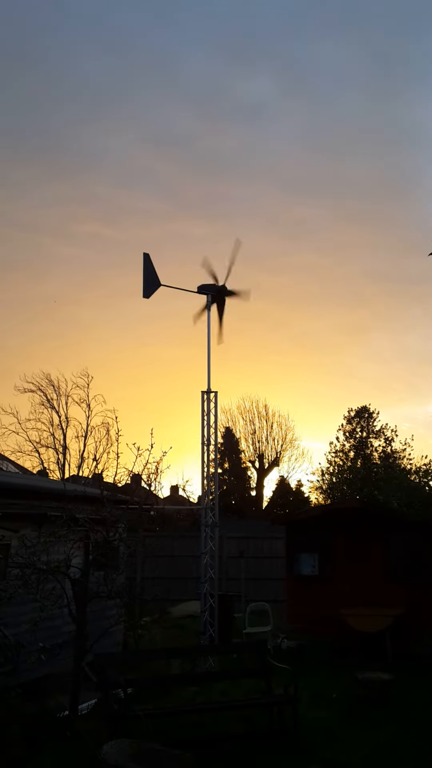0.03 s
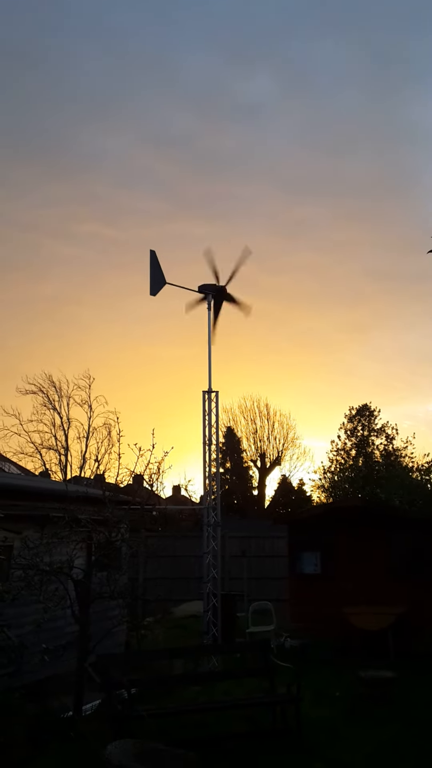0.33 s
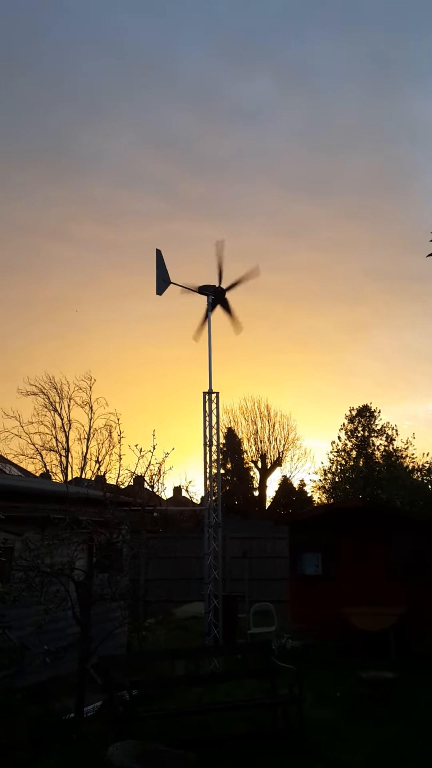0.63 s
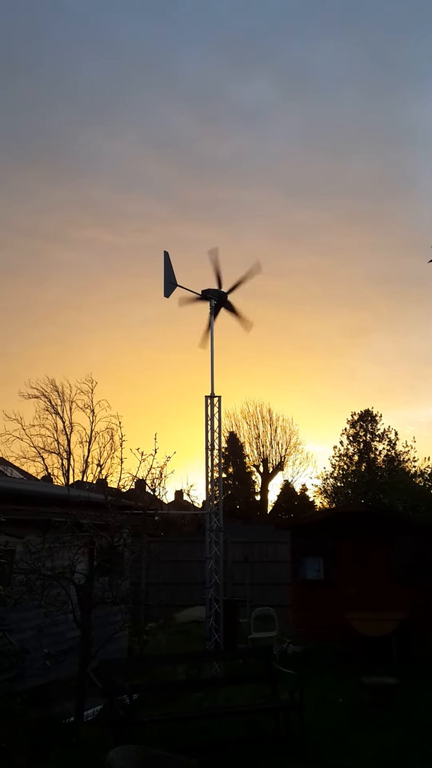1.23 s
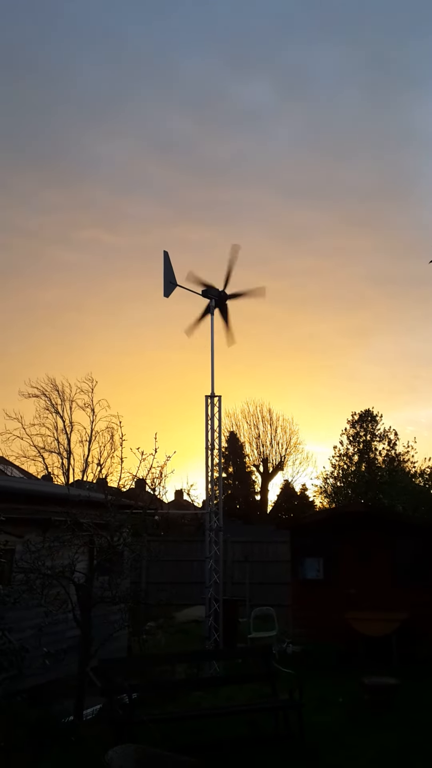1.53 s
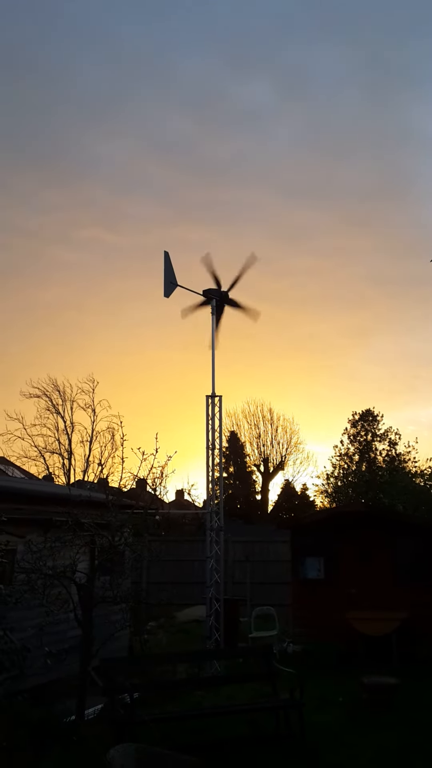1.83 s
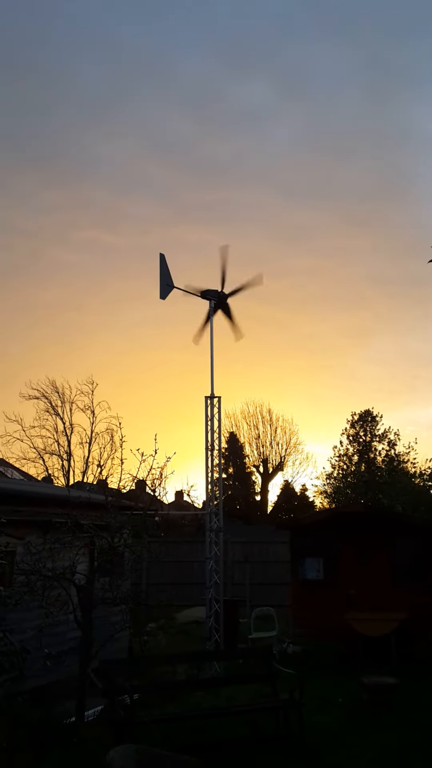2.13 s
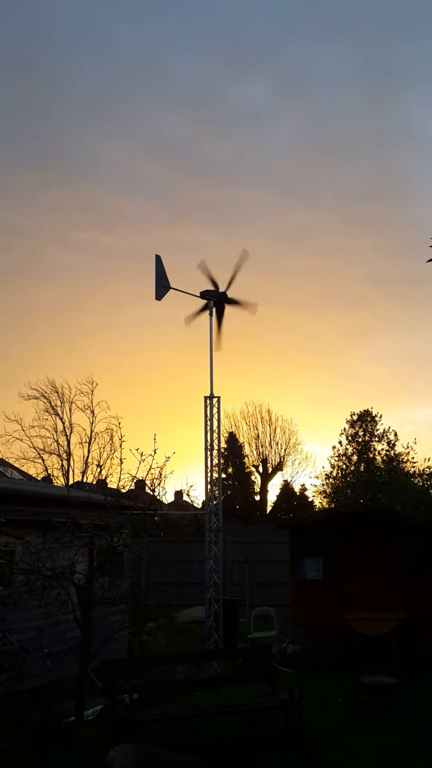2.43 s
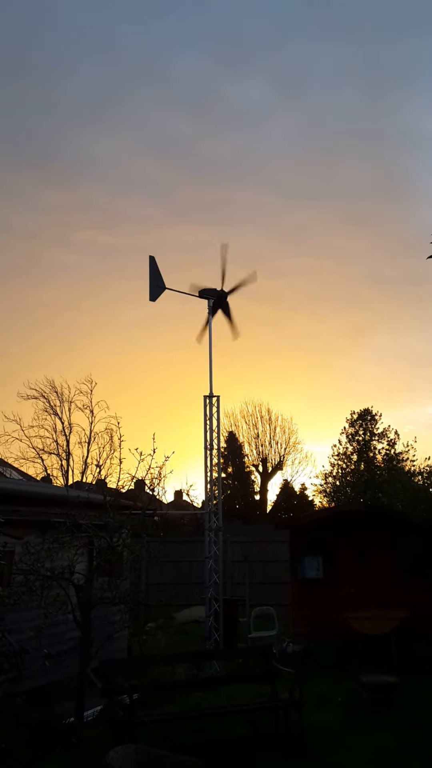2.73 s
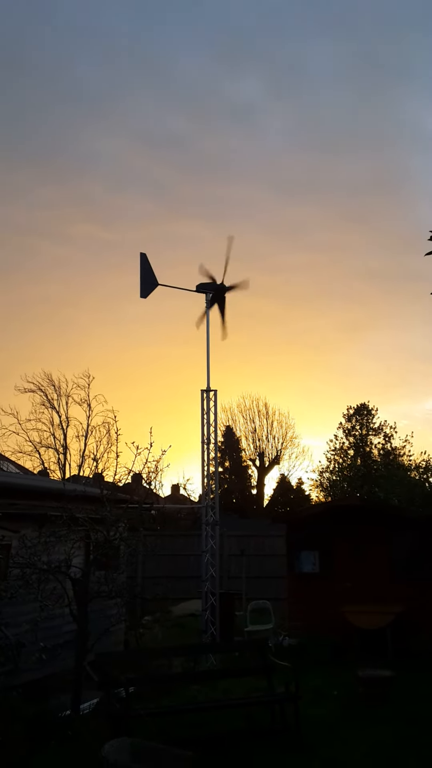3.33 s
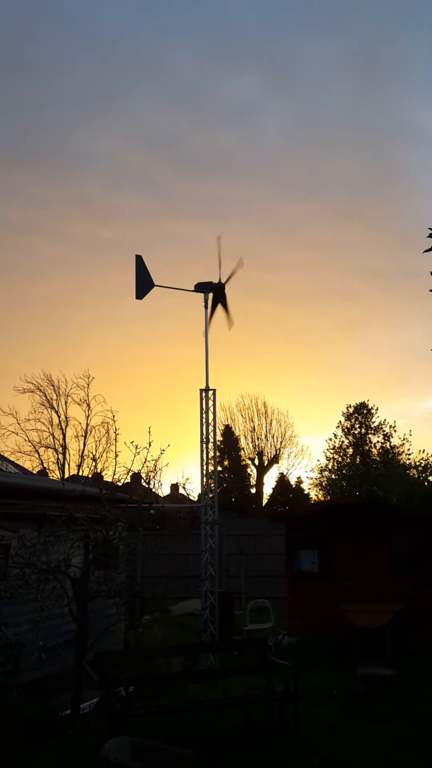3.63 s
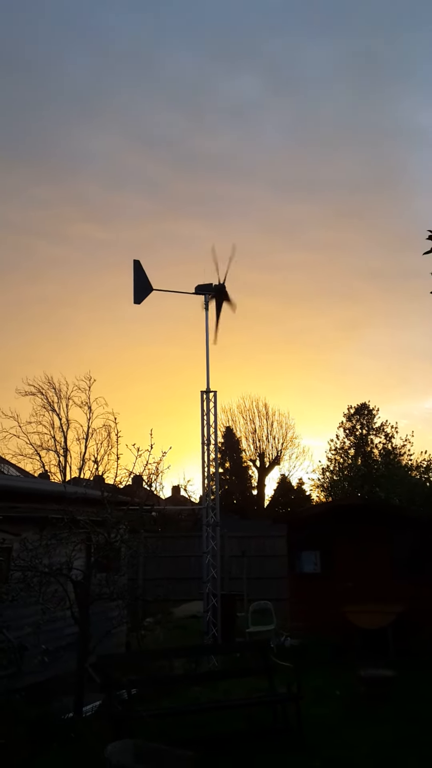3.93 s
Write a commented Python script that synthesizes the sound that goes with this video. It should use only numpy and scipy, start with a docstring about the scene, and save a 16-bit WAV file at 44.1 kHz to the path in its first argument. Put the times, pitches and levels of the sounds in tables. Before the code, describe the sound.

Wind gusts hard on the microphone, then fades to soft garden hiss with birds chirping.

```python
"""A gust buffets the microphone, its eddies slapping hard, then dies away in separate puffs and
leaves the soft hiss of air and trees in a garden. A bird to the left, probably a starling, gives a
long falling whistle, rasps, chirps and bill clicks; others call far off. A thin high note and faint
low moans come and go, perhaps from a small wind turbine. The wind is turbulent noise and pressure
pulses; the calls are gliding tones and modulated noise, echoed by walls and fences."""
import sys
import numpy as np
from scipy import signal
from scipy.fft import rfft, irfft
from scipy.io import wavfile
from scipy.ndimage import uniform_filter1d, minimum_filter1d

SR = 44100
rng = np.random.default_rng(int(sys.argv[2]) if len(sys.argv) > 2 else 0)


def file_out(sig):
    """Save sig as 16-bit WAV at sys.argv[1]."""
    # one column per channel
    cols = np.atleast_2d(sig).T
    # limit, then scale
    lim = np.clip(cols, -1, 1)
    pcm = np.round(lim * 32767).astype(np.int16)
    wavfile.write(sys.argv[1], SR, pcm)


N = 176400
T = np.arange(N) / SR

# Hiss of far air and trees. Each row: frequency in Hz, relative spectral density in dB.
AIR_SPECTRUM = [(30, -6.5), (110, -1), (170, 2.5), (280, 0.5), (380, 3.5), (530, -2.5), (700, 1.5),
                (850, -4), (1100, -0.5), (2000, -3), (2800, -8.5), (4600, -15), (5500, -21.5),
                (6500, -21.5), (7400, -19), (8200, -14), (9000, -21), (9800, -24), (16000, -24)]
# Strength of that hiss. Each row: time in seconds, level in dB.
AIR_LEVEL = [(0, -59), (1.2, -59.5), (1.6, -55.5), (2.3, -57), (2.8, -57), (3.2, -58.5), (3.7, -60),
             (4, -59.5)]
# Rustle of leaves in the hiss. Each row: time in seconds, treble gain in dB.
LEAF_GAIN = [(0, 3), (.9, 2.5), (1.25, 0), (2.2, -1), (2.7, 1), (3.2, -1.5), (4, 0.5)]
# Bouts of far twitter. Each row: start in seconds, end in seconds.
TWITTER_BOUTS = [(.92, 1.42), (2.3, 2.9)]
# Low moans. Each row: start and length in seconds, first and last pitch in Hz, level in dB.
MOANS = [(1.42, 0.31, 540, 394, -58.5), (1.8, 0.41, 477.7, 385.4, -59), (2.72, 0.205, 536, 441, -61.5)]
# Thin high note. Each row: time in seconds, pitch in Hz, relative level in dB.
THIN_NOTE = [(2.08, 11200, -86), (2.38, 10580, -77.5), (2.5, 11080, -73), (2.74, 11070, -77),
             (2.89, 10300, -78.5), (3.37, 10270, -78), (3.59, 10930, -76.5), (3.7, 10240, -74.5),
             (3.82, 10860, -77), (4, 10540, -75.5)]
# Whine an octave under the thin note. Each row: time in seconds, level in dB.
WHINE_LEVEL = [(2.2, -100), (2.4, -81), (3.1, -79), (4, -86)]
# Bird chirps. Each row: start and length in seconds, first and last pitch in Hz, level in dB.
CHIRPS = [(.0, 0.098, 3960, 2370, -52.5), (.19, 0.058, 4140, 3850, -51), (.96, 0.066, 4840, 3550, -62.5),
          (1.525, 0.035, 3670, 3640, -55.5), (1.84, 0.044, 2910, 4050, -54),
          (1.89, .072, 5870, 3600, -53.5), (2.42, 0.047, 3940, 3500, -56.5),
          (2.43, 0.078, 1212, 1153, -54.5), (2.92, 0.066, 1540, 1480, -57.5),
          (3.39, 0.19, 4950, 3375, -65.5)]
# Harsh bird notes. Each row: start and length in seconds, level in dB.
RASPS = [(0, 0.013, -57.5), (0.773, 0.021, -55.5), (0.799, 0.039, -63), (0.872, 0.032, -61),
         (1.877, 0.03, -58.5), (1.91, 0.044, -68), (1.986, 0.027, -62), (2.055, .025, -66)]
# Timbre of rasps and clicks. Each row: frequency in Hz, relative spectral density in dB.
CHATTER_SPECTRUM = [(2000, -28), (3200, -4.5), (4500, -10.5), (5400, -6), (6500, -9), (8150, -1),
                    (9200, -19.5), (15000, -30)]
# Snaps of the bill. Each row: start in seconds, level in dB.
BILL_CLICKS = [(3.879, -60.5), (3.915, -58), (3.946, -60), (3.981, -54.5)]
# Falling whistle. Each row: time in seconds, fundamental in Hz, level in dB before harmonic gains.
WHISTLE = [(.08, 2360, -72), (.125, 2300, -57), (.235, 2125, -55), (.32, 1960, -60), (.42, 1790, -60),
           (.53, 1710, -64), (.6, 1630, -68), (.78, 1420, -76)]
# Spectral envelope of the whistle's harmonics. Each row: frequency in Hz, gain in dB.
WHISTLE_TIMBRE = [(1600, -8), (2200, 2), (3500, -15), (4100, -6), (4550, 4), (4900, -2), (5600, 1),
                  (6500, -15), (7200, -6), (8500, 0), (9300, -16), (10500, -11), (12000, -17), (15500, -25)]
# Nearly level tone that ends the whistle. Each row: time in seconds, pitch in Hz, level in dB.
WHISTLE_TAIL = [(.52, 8500, -69), (.7, 8780, -68), (.78, 8850, -72)]
# The gust's steady pressure on the microphone. Each row: time in seconds, relative level in dB.
GUST_PRESSURE = [(0, -19.5), (.15, -30.5), (.235, -33), (.32, -25.5), (.42, -30), (.62, -30), (.71, -33.5),
                 (.75, -38.5), (1.05, -39), (1.22, -55), (1.4, -57), (1.57, -45.5), (1.68, -66),
                 (1.78, -75), (2.8, -87), (3.2, -72.5), (4, -66.5)]
# Puffs on top of it. Each row: centre in seconds, relative level in dB, half length in seconds.
PUFFS = [(0.076, -20.5, 0.027), (0.159, -17.5, 0.022), (0.278, -15, .016), (0.445, -19, 0.0075),
         (0.534, -29.5, 0.024), (0.621, -25, 0.022), (0.688, -15, 0.015), (0.767, -33, 0.0077),
         (0.957, -27.5, 0.0063), (1.062, -35, 0.014), (1.169, -34.5, .01), (1.286, -40.5, .041),
         (1.448, -34, .012), (1.522, -38.5, 0.022), (1.695, -42.5, 0.012), (3.071, -63, 0.017),
         (3.34, -62.5, 0.03), (3.99, -58, .04)]
# Buffeting at full force. Each row: frequency in Hz, relative spectral density in dB.
BUFFET_SPECTRUM = [(40, -13), (110, 3), (200, 1.5), (320, -1.5), (700, -17), (1050, -31.5), (2000, -43),
                   (3500, -63.5), (8000, -110)]
# Eddies striking the microphone. Each row: centre in seconds, envelope peak in dB, pitch in Hz.
EDDIES = [(0.0401, -2, 590), (0.054, -14, 407), (0.067, 8, 270), (0.074, -14, 653), (.092, -5, 543),
          (.097, -9, 700), (.104, -7.5, 360), (.134, -6.5, 300), (0.168, -9, 400), (.204, -3, 290),
          (.214, -7, 386), (.270, -5, 189), (0.2816, -16.5, 384), (0.2846, -18, 890), (0.308, -10.5, 380),
          (.326, -5, 306), (0.364, -12.5, 302), (0.449, -12.5, 337), (.536, -17, 750), (.552, -9.5, 372),
          (.589, -11.5, 285), (.687, -12.5, 510), (.695, -6, 232.5), (0.725, -16.5, 250), (0.811, -20, 247),
          (.884, -29.5, 375), (.980, -22.5, 286), (1.453, -18.5, 137), (1.508, -24, 124), (1.523, -25, 167),
          (1.635, -27, 96)]
# Lean to the left, shared unequally by the channels. Each row: frequency in Hz, lean in dB.
LEFT_LEAN = [(100, -.3), (600, -.8), (1300, 0), (2400, 2.5), (4400, 5), (8400, 10), (10500, 0)]


def from_db(db):
    """Amplitude grows tenfold for every 20 dB."""
    return 10 ** (np.asarray(db) / 20)


def unit_power(x):
    """Division by the RMS value gives a mean power of one."""
    return x / np.sqrt(np.mean(x ** 2) + 1e-20)


def in_time(rows):
    """Linear interpolation gives each column of a curve at every sample."""
    times, *columns = np.transpose(rows)
    return [np.interp(T, times, column) for column in columns]


def at_hz(spectrum, hz):
    """Interpolation in log frequency gives a spectrum's level between its points."""
    frequencies, db = np.transpose(spectrum)
    return np.interp(np.log(np.maximum(hz, 1)), np.log(frequencies), db)


def colour(x, spectrum, share=1):
    """Filtering is multiplication in frequency; share scales the curve in dB."""
    hz = np.arange(N + 1) * SR / (2 * N)
    return irfft(rfft(x, 2 * N) * from_db(share * at_hz(spectrum, hz)))[:N]


def high_pass(x, hz):
    """A second-order filter falls 12 dB per octave below its corner."""
    return signal.sosfilt(signal.butter(2, hz, "high", fs=SR, output="sos"), x)


def drift(rate_hz):
    """Low-passed noise wanders smoothly, with a spread of one."""
    step = 40
    pole = np.exp(-2 * np.pi * rate_hz * step / SR)
    slow = signal.lfilter([1], [1, -2 * pole, pole * pole], rng.standard_normal(N // step + 2002))[2000:]
    return np.interp(np.arange(N) / step, np.arange(len(slow)), unit_power(slow))


def noise_bands(spectrum, low_hz, count):
    """Overlapping half-octave filters split coloured noise into (centre in Hz, band) pairs."""
    whole = rfft(unit_power(colour(rng.standard_normal(N), spectrum)))
    hz = np.maximum(np.arange(len(whole)) * SR / N, 1)
    place = np.clip(2 * np.log2(hz / low_hz), 0, count - 1)
    return [(low_hz * 2 ** (k / 2), irfft(whole * np.maximum(1 - abs(place - k), 0), N))
            for k in range(count)]


def held_note(rows, waver=.0025):
    """Phase is the integral of frequency: returns a wavering note's pitch, phase and gain."""
    hz, db = in_time(rows)
    hz = hz * (1 + waver * drift(56))
    gate = np.clip(np.minimum(T - rows[0][0], rows[-1][0] - T) / .024, 0, 1)
    return hz, 2 * np.pi * np.cumsum(hz) / SR, from_db(db) * gate


def glides(rows, quaver=.025):
    """Random frequency modulation roughens tones that swell, slide and fade."""
    out, wobble = np.zeros(N), 1 + quaver * drift(100)
    for start, length, first_hz, last_hz, db in rows:
        on = (T >= start) & (T < start + length)
        progress = (T[on] - start) / length
        hz = first_hz * (last_hz / first_hz) ** progress * wobble[on]
        out[on] += from_db(db) * np.sin(np.pi * progress) * np.sin(2 * np.pi * np.cumsum(hz) / SR)
    return out


def garden_echoes(x, echo_db, t60_s=.38, echoes_per_s=600):
    """Reflections from walls and fences take a share of the power and decay exponentially."""
    t = T[:SR // 2]
    echoes = rng.standard_normal(len(t)) * (rng.random(len(t)) < echoes_per_s / SR)
    echoes *= (t > .008) * from_db(-60 * t / t60_s)
    reflected = signal.fftconvolve(x, echoes / np.linalg.norm(echoes))[:N]
    return (x + from_db(echo_db) * reflected) / np.hypot(1, from_db(echo_db))


def air_and_trees(leaves_above_hz=2500):
    """Distant turbulence is broadband noise; leaves brighten it with each breath of wind."""
    level_db, = in_time(AIR_LEVEL)
    leaves_db, = in_time(LEAF_GAIN)
    bands = noise_bands(AIR_SPECTRUM, 60, count=17)
    return from_db(level_db) * sum(band * from_db(leaves_db * (hz > leaves_above_hz))
                                   for hz, band in bands)


def far_twitter(low_hz=3400, high_hz=5700, notes_per_s=22):
    """Small birds sing short frequency sweeps at random pitches, the higher ones fainter."""
    slots = np.concatenate([np.arange(start, end, 1 / notes_per_s) for start, end in TWITTER_BOUTS])
    late, height, slur = rng.random((len(slots), 3)).T
    first_hz = low_hz * (high_hz / low_hz) ** height
    last_hz = first_hz * 2 ** ((slur - .5) / 2)
    return glides(zip(slots + late / notes_per_s, .035 * (.5 + late), first_hz, last_hz, -64 - 5 * height))


def low_moans():
    """Slow downward sweeps of a low tone are heard as moans."""
    return glides(MOANS, quaver=.02)


def thin_note(boost_db=3, flutter_db=4):
    """A fluttering high tone lies over its subharmonic, which phase noise makes husky."""
    _, phase, gain = held_note(THIN_NOTE)
    thin = gain * from_db(boost_db + flutter_db * drift(26)) * np.sin(phase)
    whine_gain = (gain > 0) * from_db(in_time(WHINE_LEVEL)[0] + flutter_db * drift(17))
    return thin + whine_gain * np.sin(phase / 2 + drift(60))


def bird_chatter(buzz_hz=210, buzz_depth=.38, edge_s=.005, click_decay_s=.0037):
    """Amplitude modulation makes noise rasp; each impact of the bill decays exponentially."""
    rasps = sum(from_db(db) * np.clip(np.minimum(T - start, start + length - T) / edge_s + .5, 0, 1)
                for start, length, db in RASPS)
    buzz = 1 + buzz_depth * np.sin(2 * np.pi * np.cumsum(buzz_hz * (1 + .22 * drift(50))) / SR)
    clicks = sum(from_db(db) * (T >= start) * np.exp(-abs(T - start) / click_decay_s)
                 for start, db in BILL_CLICKS)
    return (rasps * buzz + clicks) * unit_power(colour(rng.standard_normal(N), CHATTER_SPECTRUM))


def bird_whistle(flutter_db=4, dulls_from_s=.45):
    """A harmonic series falls under a fixed spectral envelope, dulls and yields to one high tone."""
    hz, phase, gain = held_note(WHISTLE)
    dulling_db = 12 * np.maximum(T - dulls_from_s, 0)  # loss for each step above the fourth harmonic
    harmonics = np.zeros(N)
    for k in range(1, 9):
        db = at_hz(WHISTLE_TIMBRE, k * hz) - dulling_db * max(k - 4, 0) + flutter_db * drift(25)
        harmonics += np.sin(k * phase) * from_db(db)
    _, tail_phase, tail_gain = held_note(WHISTLE_TAIL)
    return gain * harmonics + tail_gain * np.sin(tail_phase)


def gust_buffeting(full_force_db=-17, knee_hz=125, lump_rate_hz=76):
    """Turbulence presses on the microphone in lumps; stronger flow reaches higher frequencies."""
    gust_db, = in_time(GUST_PRESSURE)
    puffs = sum(from_db(db) * np.exp(-((T - centre) / half) ** 2) for centre, db, half in PUFFS)
    force_db = 20 * np.log10(from_db(gust_db) + puffs) - full_force_db
    bands = noise_bands(BUFFET_SPECTRUM, 30, count=16)
    # The noise's own envelope is divided out, so that force and lumps set the level.
    power = sum(band for _, band in bands) ** 2
    envelope = np.sqrt(signal.fftconvolve(power, np.hanning(SR // 40) / (SR // 80), "same") + 1e-3)
    lumps_db = 3 * np.tanh(drift(lump_rate_hz))
    tilt_db_per_octave = .19 * force_db + .5 * lumps_db - 3.5 * T  # duller as the gust slows
    out = np.zeros(N)
    for hz, band in bands:
        octaves = max(np.log2(hz / knee_hz), 0)
        patchy_db = drift(10)
        out += band * from_db(lumps_db + octaves * tilt_db_per_octave + patchy_db)
    pressure = from_db(force_db - 13) * out / envelope * np.minimum(T / .011, 1)
    return high_pass(pressure, hz=44.2)  # the microphone passes little below this


def eddy_slaps(roundness=3.6):
    """An eddy is a skewed push between two suctions; the shorter the pulse, the wider its spectrum."""
    out = np.zeros(N)
    for (centre, db, hz), skew in zip(EDDIES, rng.normal(0, .48, len(EDDIES))):
        on = abs(T - centre) < .05
        phase = 2 * np.pi * hz * (T[on] - centre)
        pulse = np.exp(1j * skew) / (1 - 1j * phase / roundness) ** (roundness + 1)
        out[on] += from_db(db) * pulse.real
    return out


def scene(near_above_db=-56):
    """Sources superpose; a level difference between the ears places the treble to the left."""
    wind = gust_buffeting() + eddy_slaps() + air_and_trees()
    side = from_db(-29.5) * high_pass(air_and_trees(), hz=2200)  # opposite in the two ears, for width
    loud_chirps = [row for row in CHIRPS if row[-1] > near_above_db]
    faint_chirps = [row for row in CHIRPS if row[-1] <= near_above_db]
    near = glides(loud_chirps) + bird_whistle() + thin_note() + bird_chatter() + low_moans()
    far = glides(faint_chirps) + far_twitter()
    mid = wind + garden_echoes(near, echo_db=-4.5) + garden_echoes(far, echo_db=-2)
    return np.array([colour(mid, LEFT_LEAN, .8) + side, colour(mid, LEFT_LEAN, -.17) - side])


def record(dry, ceiling=.97, stopband_hz=16500):
    """A limiter lowers the gain around the hardest slaps; a steep low-pass filter cuts the top."""
    overload = np.maximum(abs(dry).max(axis=0) / ceiling, 1)
    gain = minimum_filter1d(1 / overload, size=301)
    gain = uniform_filter1d(uniform_filter1d(gain, size=151), size=151)
    return signal.sosfilt(signal.cheby2(12, 70, stopband_hz, fs=SR, output="sos"), dry * gain)


dry = scene()
out = record(dry)
file_out(out)
```